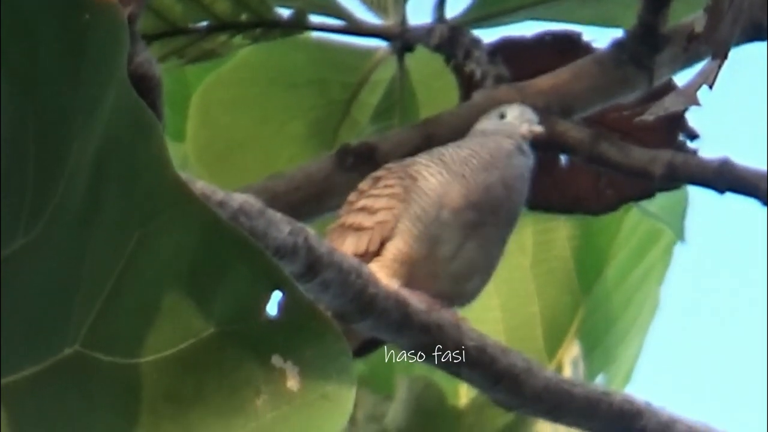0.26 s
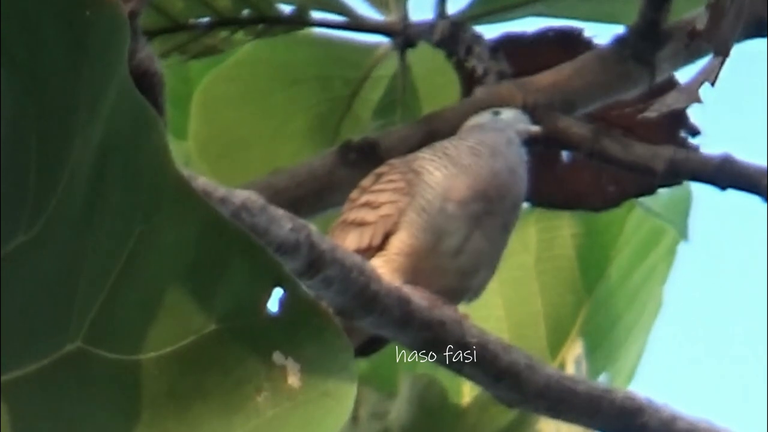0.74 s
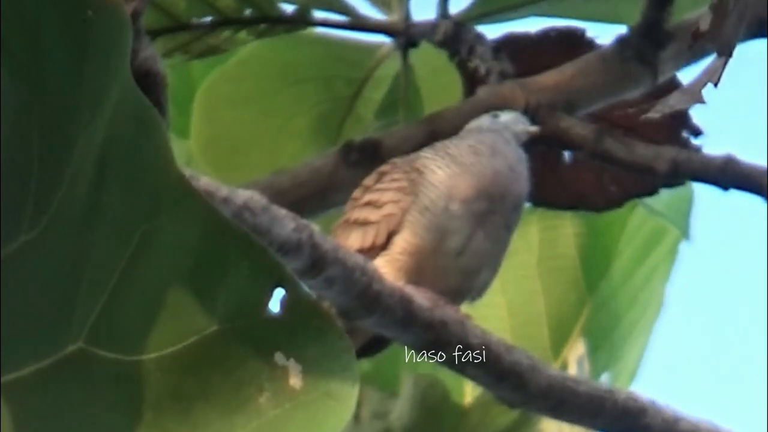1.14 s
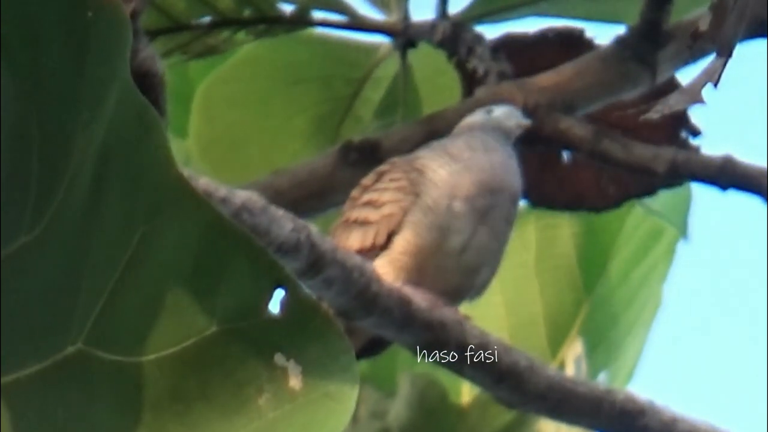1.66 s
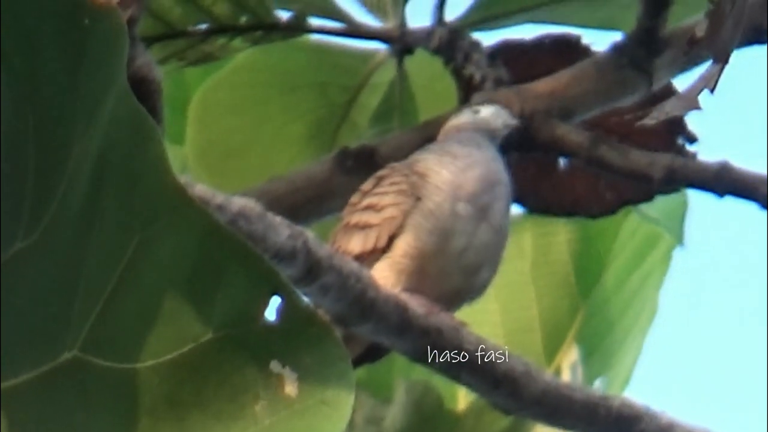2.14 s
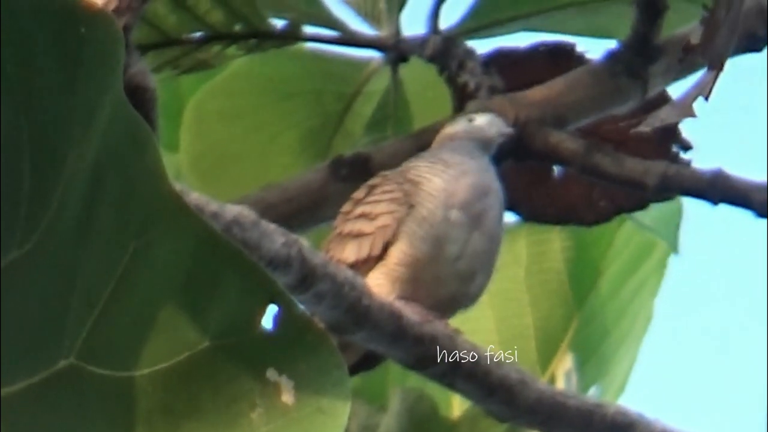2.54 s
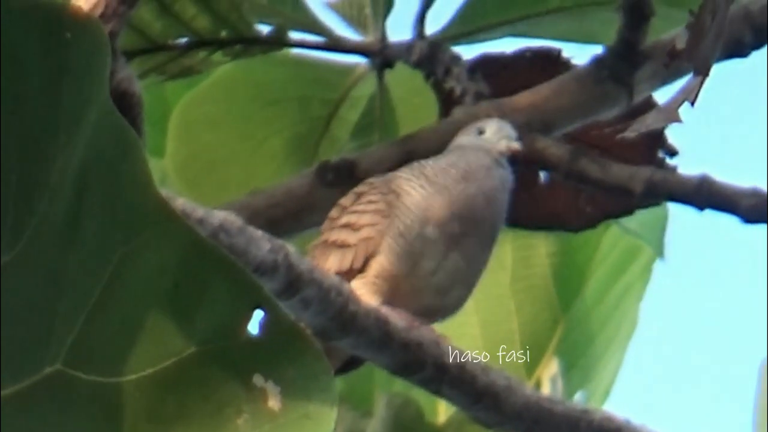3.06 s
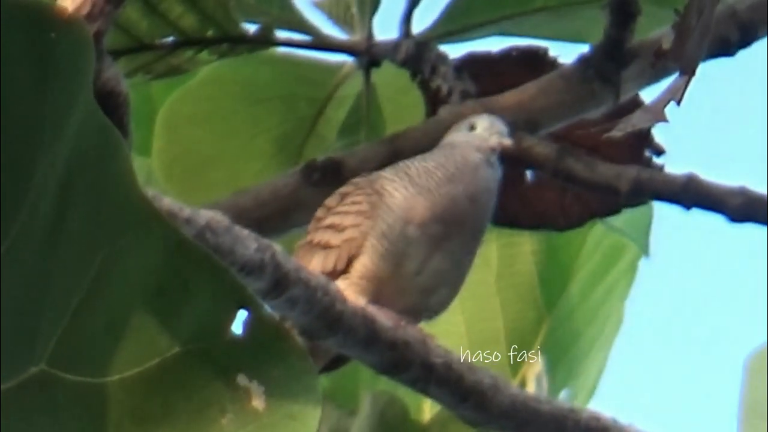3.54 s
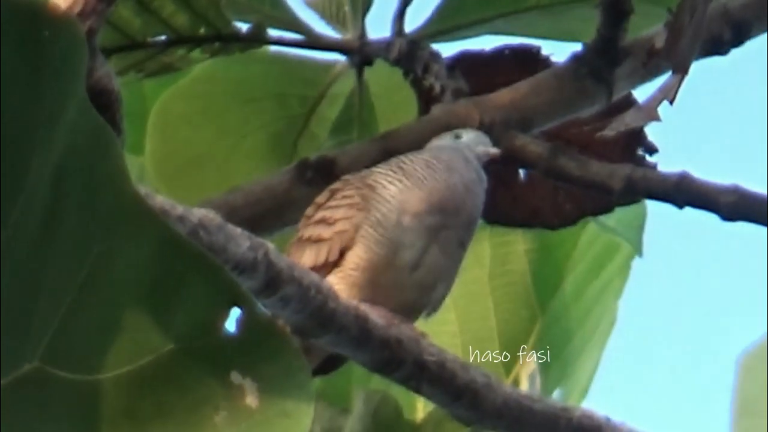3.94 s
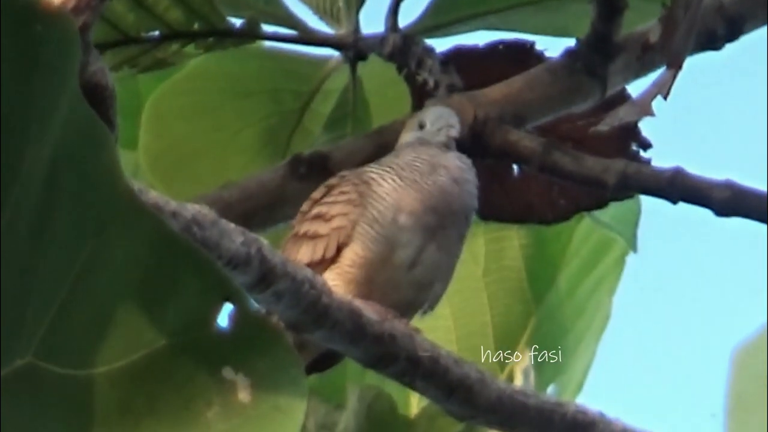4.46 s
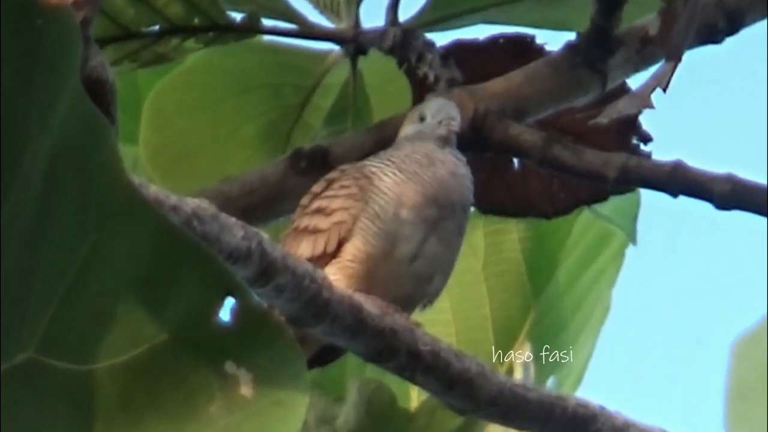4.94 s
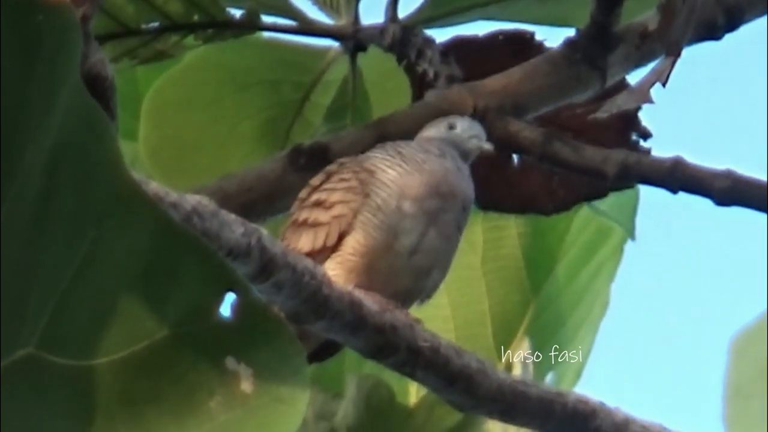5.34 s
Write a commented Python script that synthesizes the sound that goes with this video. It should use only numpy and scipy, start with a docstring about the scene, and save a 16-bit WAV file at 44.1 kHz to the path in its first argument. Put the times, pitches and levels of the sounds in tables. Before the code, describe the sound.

A nearby dove gives a quick rolling five-note coo twice, three seconds apart, over shrilling insects, distant doves and small chirping birds.

```python
"""In a grove, a dove close to a stereo pair gives the same rolling five-note coo twice: a sine with faint
overtones and puffs of air, followed by short echoes from nearby surfaces. Farther off, other doves coo as
arched sines; small birds whistle and chirp as gliding sines and rasp as noisy pulses through resonances.
Cricket, cicada and katydid are throbbing bands of noise; noise in half-octave bands makes rumble and hiss."""
import sys
import numpy as np
from scipy import signal
from scipy.io import wavfile
from scipy.ndimage import uniform_filter1d

SR = 44100
rng = np.random.default_rng(int(sys.argv[2]) if len(sys.argv) > 2 else 0)


def rack_gain(trim_db):
    """Turn a fader trim in dB into the linear factor to multiply a signal by."""
    fader = np.asarray(trim_db, float)
    return 10 ** (fader / 20)


def master_out(mix):
    """Clip the mix to full scale and print it as 16-bit PCM to the path in sys.argv[1]."""
    frames = np.transpose(np.atleast_2d(mix))
    ceiling = np.clip(frames, -1, 1)
    pcm = np.round(ceiling * 32767).astype(np.int16)
    wavfile.write(sys.argv[1], SR, pcm)


N = 246959   # length in samples

# Near dove, opening note, which rolls and breaks once: start_s [s], pitch_hz [Hz], level_db [dB]
OPENING = [(.044, 874, -48.5), (.053, 884, -27.5), (.07, 994, -12.5), (.078, 1182, -16.5),
           (.095, 1257, -15), (.12, 1304, -11.5), (.132, 1267, -15), (.15, 1283, -10), (.17, 1248, -16),
           (.188, 1226, -16.5), (.2, 1176, -27), (.208, 1168, -14), (.222, 1209, -12.5),
           (.236, 1136, -13.5), (.243, 1089, -17.5), (.248, 984, -53)]
# Near dove, the four notes that follow: start_s [s], length_s [s], top_hz [Hz], end_hz [Hz], level_db [dB],
# mid_slack_db [dB], end_level_db [dB]
COO_NOTES = [(.267, 0.024, 1135, 1035, -10.5, 0, -19.5), (0.339, 0.029, 1154, 1058, -12, 0.7, -15),
             (.434, 0.088, 1211, 1083, -12.5, 2.1, -11.5), (.627, 0.089, 1240, 1093, -12.5, 4.5, -13)]
REPEAT_S = 3.04   # the phrase returns after this long
ONSET_HZ, FLICK_S, FLICK_SHARE = 983, 0.0059, 0.95   # a note opens low and flicks up to this share of its top
TOP_AT = 0.4   # after the flick, the top comes at this share of what is left
ATTACK_S, ATTACK_DB = 0.0075, 18   # the step into a note
RELEASE_S, RELEASE_DB, RELEASE_SAG_HZ = 0.0067, 5.5, 59.7   # the step out of it
SILENCE_DB = -50
# Overtones of the near dove, before effort and tension: multiple [of the pitch], level_db [dB]
OVERTONES = [(2, -40.5), (3, -49), (4, -46), (5, -54), (6, -32), (7, -53), (8, -51), (9, -56), (10, -47),
             (11, -54)]
# Air that escapes as a note starts: centre_s [s], level_db [dB]
PUFFS = [(.051, -29.5), (0.257, -46.5), (.331, -34), (0.422, -39), (.616, -37.5)]
# Direct sound and early echoes at the two microphones: left_ms [ms], left_db [dB], right_ms [ms], right_db [dB]
ECHOES = [(0.0, 0.0, -0.0, -1.5), (5.01, -13.2, 4.2, -7.0), (8.09, -11.8, 8.13, -16.2),
          (15.46, -15.8, 15.43, -18.1), (25.32, -23.7, 25.34, -21.5), (34.13, -30.2, 34.1, -27.5),
          (43.73, -29.9, 43.74, -29.5), (53.62, -25.7, 53.61, -25.3)]
RIGHT_LAG_MS = 0.055   # added to every right_ms
GROVE_T60_S = 0.7

# Far doves, arched notes: start_s [s], length_s [s], top_hz [Hz], end_hz [Hz], level_db [dB]
FAR_COOS = [(0.69, 0.18, 1334, 1316, -56), (0.899, 0.18, 1327, 1307, -57), (.96, 0.055, 1155, 1135, -50.5),
            (1.111, 0.093, 1302, 1295, -52.5), (1.205, 0.046, 1308, 1220, -47),
            (1.33, 0.088, 1302, 1296, -52), (1.429, 0.038, 1305, 1220, -48.5),
            (1.552, 0.1, 1306, 1305, -53), (1.659, 0.045, 1316, 1200, -49), (1.782, .11, 1312, 1277, -52.5),
            (1.893, 0.044, 1317, 1214, -50.5), (2.399, .21, 1323, 1212, -53),
            (2.63, 0.046, 1220, 1189, -51.5), (2.728, 0.12, 1292, 1135, -49.5),
            (2.922, .13, 1293, 1092, -49.5), (4.04, 0.33, 1208, 1024, -57), (4.425, 0.09, 1150, 1120, -56),
            (5.149, 0.23, 1350, 1195, -50), (5.387, 0.047, 1230, 1127, -43.5),
            (5.463, 0.05, 1223, 1150, -48), (5.556, 0.11, 1303, 1250, -48)]
SCOOP = 0.8   # a far coo starts at this share of its top pitch
# A deeper far dove: start_s [s], length_s [s], start_hz [Hz], end_hz [Hz], level_db [dB]
DEEP_COOS = [(1.59, 0.32, 471, 467, -69), (2.071, 0.16, 495, 445, -64.5), (2.25, .37, 466, 459.5, -60),
             (2.661, 0.43, 452, 458.6, -58), (2.96, .08, 460, 542, -60.5), (4.224, 0.15, 576, 566, -62)]

# Whistles that fall ever more slowly and swell: start_s [s], length_s [s], start_hz [Hz],
# level_db [dB, before the onset, swell and closing dips]
WHISTLES = [(2.35, 0.401, 8886, -33.5), (5.236, 0.43, 8840, -37.5)]
WHISTLE_KNEE_S, WHISTLE_FALL = 0.0105, 0.066   # time scale and exponent of the falling pitch
WHISTLE_SWELL_DB_PER_S, WHISTLE_ATTACK_S = 31, 0.028
# Whistles that end in a downward hook, one list each: time_s [s], pitch_hz [Hz], level_db [dB]
HOOKS = [
    [(.13, 7750, -54), (.16, 7450, -40.5), (.23, 7020, -38.5), (.255, 6600, -38), (.28, 5700, -50)],
    [(2.762, 7000, -44), (2.78, 6960, -33.5), (2.852, 6880, -40.5), (2.89, 6400, -52)],
]
# Near, clean falling chips: start_s [s], length_s [s], start_hz [Hz], end_hz [Hz], level_db [dB],
# bend [exponent: over 1 holds the pitch and drops late]
CHIPS = [(.985, 0.041, 6380, 4600, -37, 1.9), (1.28, .03, 6670, 2460, -44.5, 0.93),
         (2.462, 0.034, 6700, 5000, -39, 1.1), (3.6, 0.051, 6590, 5270, -37, 3.8),
         (4.43, .045, 6800, 5685, -40.5, 2.8), (5.04, 0.029, 7700, 7260, -51.5, 1.05)]
CHIP_ECHO_MS, CHIP_ECHO_DB = 16, -10.5
# Far chirps and peeps: start_s [s], length_s [s], start_hz [Hz], end_hz [Hz], level_db [dB],
# bend [exponent: under 1 moves early and levels out]
CHIRPS = [(.005, 0.1, 2230, 2600, -51, 1.1), (1.325, .035, 3450, 3600, -51, 1.1),
          (1.7, .04, 3200, 3500, -54, 1.1), (1.055, .07, 3490, 2196, -51, .8),
          (1.355, 0.082, 3920, 1870, -52, 0.64), (1.65, 0.082, 3510, 1930, -50.5, 1.1),
          (1.8, 0.25, 2710, 2200, -56.5, .5), (1.955, 0.052, 3270, 2710, -51, 1.1),
          (2.03, 0.057, 3080, 3030, -50, 0.93), (2.21, 0.18, 2960, 2350, -51.5, 0.22),
          (2.25, 0.093, 3550, 3490, -56, .4), (2.48, 0.083, 3450, 3380, -55, 0.93),
          (2.57, .075, 3430, 2220, -52.5, 1.6), (2.66, 0.18, 3500, 3070, -59.5, .4),
          (2.89, 0.081, 3524, 2297, -49, 1.04), (3.22, 0.076, 3720, 2205, -54, 1.17),
          (4.03, .25, 4457, 4380, -65, 0.44), (5.065, .065, 3130, 1950, -49, 1.1),
          (5.41, 0.048, 3160, 2154, -48.5, 1.15)]
# Hoarse rasps of a small bird: start_s [s], level_db [dB], length_s [s]
RASPS = [(2.06, -49.5, 0.072), (2.193, -51, 0.066), (2.414, -47.5, 0.076), (2.551, -49, 0.081),
         (3.736, -46.5, 0.076), (3.83, -47, .06), (4.607, -46.5, 0.074), (4.731, -47.5, 0.061)]
# Resonances of its throat: centre_hz [Hz], width_hz [Hz], level_db [dB]
RASP_THROAT = [(3340, 570, -4.5), (4500, 520, -10.5), (4960, 600, -17), (1660, 510, -15)]

# Cricket level: time_s [s], level_db [dB]
CRICKET = [(0.0, -43), (0.43, -42), (0.95, -47.5), (1.46, -44), (1.78, -47.5), (2.26, -49.5), (2.7, -48.5),
           (3.09, -48.5), (3.51, -49.5), (3.63, -49), (4.54, -51.5), (5.15, -53), (5.6, -54)]
# Cicada buzz, which swells and stops short: time_s [s], level_db [dB], centre_hz [Hz]
CICADA = [(0, -48.5, 6900), (.375, -45.5, 6900), (.39, -60, 6900), (.85, -58, 6800), (1.25, -47, 6850),
          (1.725, -48.5, 6950), (1.74, -64, 6950), (1.95, -61.5, 6950), (2.5, -51, 6950), (3.0, -50, 6900),
          (3.4, -58, 6820), (3.9, -51.5, 6800), (4.2, -49, 6800), (4.51, -53.5, 6800), (4.7, -57.5, 6500),
          (5.32, -47.5, 6600), (5.35, -52.5, 6700), (5.6, -50.5, 6700)]
# Broad sputters as the buzz drops: start_s [s], level_db [dB], length_s [s]
SPUTTERS = [(0.378, -47, 0.1), (4.53, -51.5, 0.097)]
# High katydid: time_s [s], level_db [dB, before pulsing], pulse_depth [0-1]
KATYDID = [(0.0, -61.5, 0.5), (0.98, -59.5, 0), (2.46, -56.5, 0.23), (3.06, -54.5, 0.37), (3.32, -57, 0.2),
           (5.51, -55, 0.3), (5.6, -55.5, 0.3)]
# Spectrum of the air, relative: frequency_hz [Hz], level_db [dB per Hz]
AIR = [(25, -20.5), (60, 1), (130, -1), (250, -11.5), (500, -15.5), (1000, -15), (2000, -23.5), (3200, -21),
       (4500, -26.5), (5400, -27), (8200, -26), (11000, -32), (13000, -36), (15500, -39)]
# Level of the air: time_s [s], level_db [dB]
AIR_LEVEL = [(0.0, -44), (0.65, -46.5), (0.83, -47), (1.11, -47.5), (1.89, -50), (2.37, -49.5), (2.92, -46),
             (3.46, -45.5), (4.29, -49), (4.87, -49.5), (5.1, -49.5), (5.6, -48)]
# How alike the air is at the two microphones: frequency_hz [Hz], likeness [0-1]
LIKENESS = [(25, .999), (60, 0.99), (125, 1), (250, 0.84), (1000, 0.21), (3000, 0.33), (8000, 1),
            (14000, 0.6)]


def dove():
    """A sine from the inflated crop, faint overtones, a puff of air at each start, then the echoes."""
    t = np.arange(N) / SR
    rows = phrase_rows()
    hz, level_db = in_time(rows)
    sounding = (t > rows[0][0]) & (t < rows[-1][0])
    # membranes cannot change at once
    inertia = np.hanning(110) / np.hanning(110).sum()
    hz = np.convolve(hz, inertia, "same")
    gain = np.convolve(rack_gain(level_db) * sounding, inertia, "same")
    phase = 2 * np.pi * np.cumsum(hz) / SR

    tension_db = 0.003 * (hz - 1250)   # tighter membranes sing higher and brighter
    effort = gain / rack_gain(-14)   # overtones grow with loudness
    overtones = 0
    for k, db in OVERTONES:
        overtone_gain = rack_gain(db + k * tension_db + 3.5 * drift(45.03))
        overtones = overtones + overtone_gain * np.sin(k * phase)
    tone = np.sin(phase) + effort * overtones

    puff = sum(rack_gain(db) * np.exp(-((t - s) / 0.006) ** 2) for s, db in PUFFS)
    breath_noise = rms_one(band(rng.standard_normal(N), 540, 1380))
    breath = (puff + rack_gain(-34) * gain) * breath_noise
    phrase = np.sqrt(2) * rack_gain(0.26) * gain * tone + breath
    voice = phrase + later(phrase, 1000 * REPEAT_S)

    left = sum(rack_gain(db) * later(voice, ms) for ms, db, _, _ in ECHOES)
    right = sum(rack_gain(db) * later(voice, ms + RIGHT_LAG_MS) for _, _, ms, db in ECHOES)
    return np.array([left, right]) + rack_gain(-24) * grove(voice)


def phrase_rows():
    """Opening note, then each note as step in, flick up, arch, step out: rows (s, Hz, dB)."""
    rows = list(OPENING)
    u = np.linspace(0, 1, num=7)
    up = np.clip(1 - u / TOP_AT, 0, 1)
    down = np.clip((u - TOP_AT) / (1 - TOP_AT), 0, 1)
    for s, length, top, end, db, slack_db, end_db in COO_NOTES:
        hz = top - top * (1 - FLICK_SHARE) * up ** 2 - (top - end) * down ** 1.6
        level_db = db + (end_db - db) * u - slack_db * np.sin(np.pi * u)
        rows += [(s - 2 * ATTACK_S, ONSET_HZ, SILENCE_DB),
                 (s - ATTACK_S, ONSET_HZ, db - ATTACK_DB),
                 (s, ONSET_HZ, db)]
        rows += zip(s + FLICK_S + (length - FLICK_S) * u, hz, level_db)
        rows += [(s + length + RELEASE_S, end - RELEASE_SAG_HZ, end_db - RELEASE_DB),
                 (s + length + 2 * RELEASE_S, end - RELEASE_SAG_HZ, SILENCE_DB)]
    return rows


def far_doves():
    """Arched notes scoop up and sag, deeper ones glide; distance adds scatter."""
    arches = []
    for s, length, top, end, db in FAR_COOS:
        arches.append([(s, SCOOP * top, db - 3),
                       (s + min(0.2 * length, 0.025), 0.97 * top, db),
                       (s + min(0.33 * length, 0.06), top, db),
                       (s + 0.75 * length, top - 0.55 * (top - end), db - 3.5),
                       (s + length, end, db)])
    # a bend of 1 is a straight glide; a negative fall ends louder
    deep = glides([(*coo, 1) for coo in DEEP_COOS], peak_at=0.4, rise_db=0, fall_db=-1)
    coos = notes(arches, fade_s=0.0095, octave_db=-38.5) + notes(deep, fade_s=0.018, octave_db=-32)
    coos = coos * (0.95 + 0.4 * drift(60))   # the roll in their voices
    return coos * rack_gain([[-1.5], [1.5]]) + rack_gain(-2.5) * grove(coos)


def small_birds():
    """Gliding near-sines: whistles are beaded, chips near and clean, chirps far, rough and smeared."""
    whistles = notes(long_whistles() + HOOKS, fade_s=0.012, octave_db=-42)
    whistles = whistles * rack_gain(4 * drift(90))   # the beading
    chips = notes(glides(CHIPS, peak_at=0.3, rise_db=7, fall_db=10), fade_s=0.0036, octave_db=-42.5)
    chips = chips + rack_gain(CHIP_ECHO_DB) * later(chips, CHIP_ECHO_MS)
    near = whistles + chips
    chirps = notes(glides(CHIRPS, peak_at=0.27, rise_db=-0.5, fall_db=7), fade_s=0.0029, octave_db=-39)
    chirps = chirps * (0.4 + 0.65 * drift(350))   # leaves in the path make the level flutter
    near_pair = near * rack_gain([[-0.4], [0.4]]) + rack_gain(-14) * grove(near)
    far_pair = chirps * rack_gain([[-1.2], [1.2]]) + rack_gain(-2) * grove(chirps)
    return near_pair + far_pair


def long_whistles():
    """Pitch falls as a power of time while the level swells, then dips at the very end."""
    tables = []
    for s, length, start, db in WHISTLES:
        t = length * np.linspace(0, 1, num=41) ** 2
        onset_db = -13.9 * np.exp(-t / WHISTLE_ATTACK_S)
        swell_db = -WHISTLE_SWELL_DB_PER_S * (length - t)
        closing_db = -13 * np.exp((t - length) / 0.02)
        hz = start * (1 + t / WHISTLE_KNEE_S) ** -WHISTLE_FALL
        tables.append(np.transpose([s + t, hz, db + onset_db + swell_db + closing_db]))
    return tables


def rasps():
    """A shaky pulse train, half buried in breath noise, rises through each rasp and rings the throat."""
    t, gate, rise = np.arange(N) / SR, np.zeros(N), np.zeros(N)
    for s, level_db, length in RASPS:
        # 20 ms in, 8 ms out
        gate += rack_gain(level_db) * np.clip(np.minimum((t - s) / 0.02, (s + length - t) / 0.008), 0, 1)
        rise += np.where((t > s) & (t < s + length), (t - s) / length, 0)
    pulse_hz = 430 * (1 + 0.16 * rise + 0.03 * drift(150))
    cycle = np.cumsum(pulse_hz) / SR % 1
    breath = np.exp(-cycle / 0.35) * rng.standard_normal(N)
    source = breath + 1.6 * np.exp(-cycle / 0.04)
    throat = sum(rack_gain(db) * resonance(source, hz, width) for hz, width, db in RASP_THROAT)
    voice = gate * rms_one(band(throat, 900, 8900))
    return voice * rack_gain([[-1.5], [1.5]]) + rack_gain(-6.5) * grove(voice)


def cricket():
    """Wing strokes: resonant noise pulsed at about 27 a second and at twice and three times that rate."""
    level_db, = in_time(CRICKET)
    turn = 2 * np.pi * np.cumsum(27.4 * (1 + 0.0067 * drift(2.8))) / SR
    strokes = 1 + 0.15 * np.cos(turn) + 0.22 * np.cos(2 * turn) + 0.17 * np.cos(3 * turn + 0.37)
    wing = resonance(band(spread(0.44), 5713, 6570), 6200, 370)
    return rack_gain(level_db + 2.3 * drift(8)) * rms_one(wing * strokes)


def cicada():
    """Tymbal ring throbbing about 156 times a second; its centre slides with the insect's posture."""
    level_db, hz = in_time(CICADA)
    narrow = signal.butter(2, 150, fs=SR, output="sos")   # Hz, half the width of the ring
    ring = signal.sosfilt(narrow, spread(1.0) + 1j * spread(0.77))
    carrier = np.exp(2j * np.pi * np.cumsum(hz) / SR)   # moves the ring up to its centre
    buzz = np.real(ring * carrier) * (0.43 + throb(156, power=2))
    return rack_gain(level_db + 1.1 * drift(10)) * rms_one(buzz)


def sputters():
    """A short dying burst of broad, flickering treble noise."""
    t, gate = np.arange(N) / SR, np.zeros(N)
    for s, db, length in SPUTTERS:
        dying_db = db - 4.8 * np.clip((t - s) / length, 0, 1)
        gate += rack_gain(dying_db) * ((t > s) & (t < s + length))
    hiss = rms_one(band(spread(0.87), 6900, 8500))
    return uniform_filter1d(gate, size=400) * rack_gain(3.2 * drift(90)) * hiss


def katydid():
    """A broad high hiss pulsed about 122 times a second, to a changing depth."""
    level_db, depth = in_time(KATYDID)
    depth = np.clip(depth, 0, 1)
    pulses = 1 - depth + 2.2 * depth * throb(122.3, power=2.1)
    return rack_gain(level_db) * rms_one(band(spread(0.95), 8830, 10120)) * pulses


def air():
    """Far rumble and leaf hiss in half-octave bands, each with its own flicker and likeness."""
    out = 0
    edges_hz = 22 * 2 ** np.arange(0, 9.6, 0.5)
    white = rng.standard_normal((2, 2, N))   # neighbouring bands take different noises
    for k, (low, high) in enumerate(zip(edges_hz, edges_hz[1:])):
        half_octave = signal.butter(2, [low, high], "band", fs=SR, output="sos")
        mid, side = signal.sosfilt(half_octave, white[k % 2])
        hz = np.sqrt(low * high)
        gain = rack_gain(at_hz(AIR, hz) + 2 * drift(3.7))
        out = out + gain * pair(mid, side, at_hz(LIKENESS, hz))
    level_db, = in_time(AIR_LEVEL)
    return rack_gain(level_db) * rms_one(out)


def grove(x):
    """Scatter from trunks and leaves: decaying noise after 30 ms, another draw on each side."""
    t = np.arange(SR // 2) / SR
    tail = rng.standard_normal((2, len(t))) * rack_gain(-60 * t / GROVE_T60_S) * (t > 0.03)
    tail = tail / np.sqrt(np.sum(tail ** 2, axis=1, keepdims=True))
    return signal.fftconvolve(x[None], tail, axes=1)[:, :N]


def notes(tables, fade_s, octave_db):
    """Near-sine notes that follow their tables (s, Hz, dB) and fade in and out."""
    out, t = np.zeros(N), np.arange(N) / SR
    for rows in tables:
        hz, level_db = in_time(rows)
        phase = 2 * np.pi * np.cumsum(hz) / SR
        gate = np.clip(np.minimum(t - rows[0][0], rows[-1][0] - t) / fade_s, 0, 1)
        tone = np.sin(phase) + rack_gain(octave_db) * np.sin(2 * phase)
        out += np.sqrt(2) * rack_gain(level_db) * gate * tone
    return out


def glides(calls, peak_at, rise_db, fall_db):
    """Calls slide from start to end pitch; the level starts rise_db and ends fall_db below its middle."""
    u = np.linspace(0, 1, num=21)
    shape_db = np.interp(u, [0, peak_at, 1], [-rise_db, 0, -fall_db])
    return [np.transpose([s + length * u, start + (end - start) * u ** bend, db + shape_db])
            for s, length, start, end, db, bend in calls]


def throb(per_s, power):
    """A raised cosine narrowed by a power, at a slightly wandering rate."""
    phase = 2 * np.pi * np.cumsum(per_s * (1 + 0.011 * drift(2.1))) / SR
    return (0.5 + 0.5 * np.cos(phase)) ** power


def resonance(x, hz, width_hz):
    """Two-pole resonance with a peak gain of about 1."""
    r = np.exp(-np.pi * width_hz / SR)
    poles = [1, -2 * r * np.cos(2 * np.pi * hz / SR), r * r]
    return signal.lfilter([(1 - r * r) / 2, 0, (r * r - 1) / 2], poles, x)


def band(x, low_hz, high_hz):
    """Steep band-pass."""
    return signal.sosfilt(signal.butter(3, [low_hz, high_hz], "band", fs=SR, output="sos"), x)


def pair(mid, side, alike):
    """Left and right from two noises, alike to the given degree (0-1)."""
    alike = np.clip(alike, 0, 1)
    return np.sqrt(1 + alike) * mid + np.sqrt(1 - alike) * side * [[1], [-1]]


def spread(alike):
    """White noise on left and right, alike to the given degree."""
    mid, side = rng.standard_normal((2, N))
    return pair(mid, side, alike)


def drift(rate):
    """Random values of spread 1, rate of them a second, joined by straight lines."""
    points = int(rate * N / SR) + 2
    return np.interp(np.linspace(0, points - 1, N), np.arange(points), rng.standard_normal(points))


def later(x, ms):
    """Delay by interpolated reading."""
    return np.interp(np.arange(N) - ms * SR / 1000, np.arange(N), x, left=0)


def in_time(rows):
    """Table columns as curves over time."""
    s, *columns = np.transpose(rows)
    return [np.interp(np.arange(N) / SR, s, c) for c in columns]


def at_hz(points, hz):
    """Read a spectrum on a log frequency axis."""
    points_hz, values = np.transpose(points)
    return np.interp(np.log(hz), np.log(points_hz), values)


def rms_one(x):
    """Scale to rms 1."""
    return x / np.sqrt(np.mean(x ** 2) + 1e-20)


def scene():
    """All voices over the insects and the air."""
    insects = cricket() + cicada() + sputters() + katydid()
    return dove() + far_doves() + small_birds() + rasps() + insects + air()


def roll_off(x):
    """The treble ends steeply here."""
    return signal.sosfilt(signal.butter(12, 15620, fs=SR, output="sos"), x)


def record(dry):
    """The finished mix as it is kept."""
    return roll_off(dry)


dry = scene()
out = record(dry)
master_out(out)
```